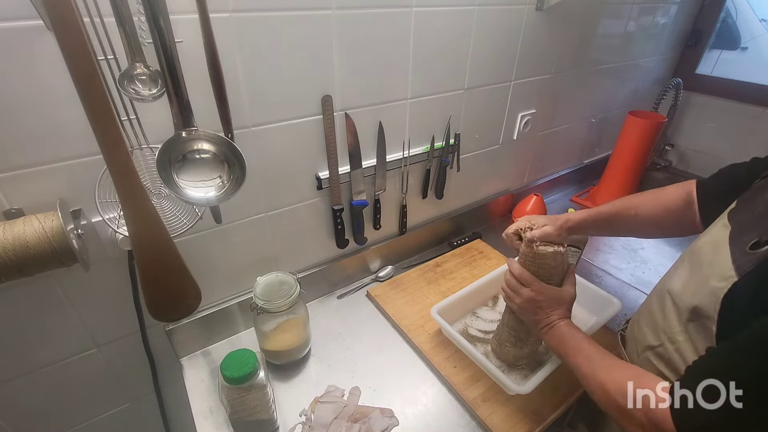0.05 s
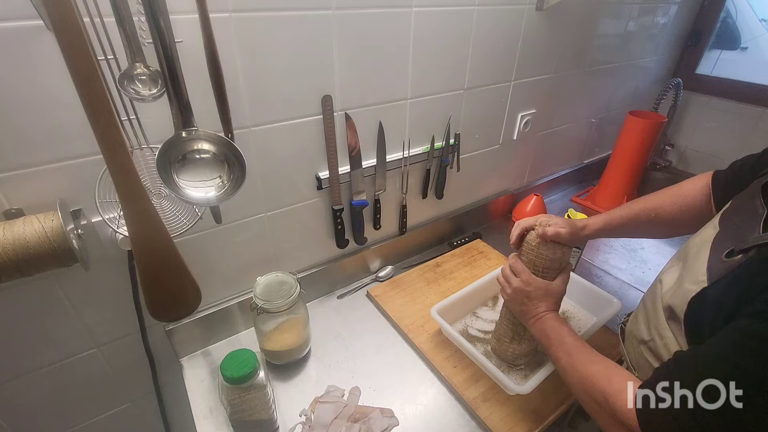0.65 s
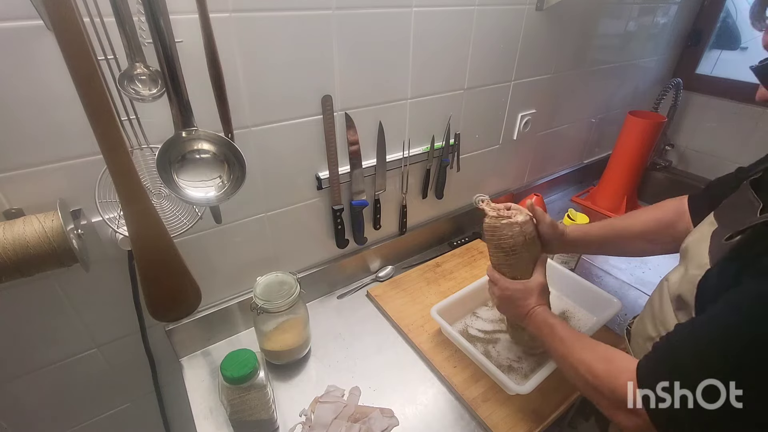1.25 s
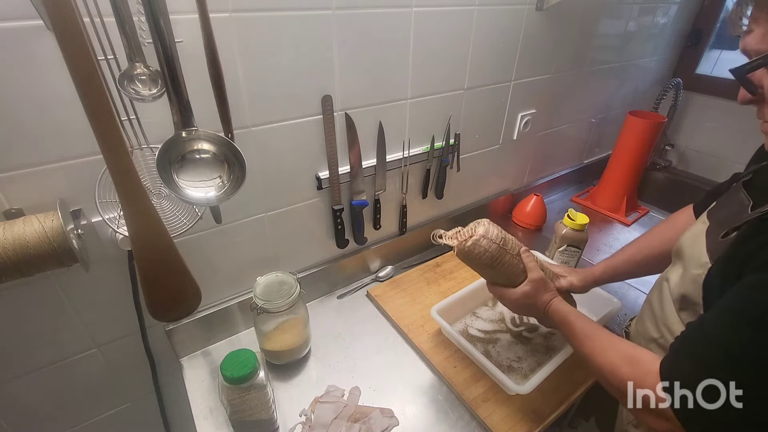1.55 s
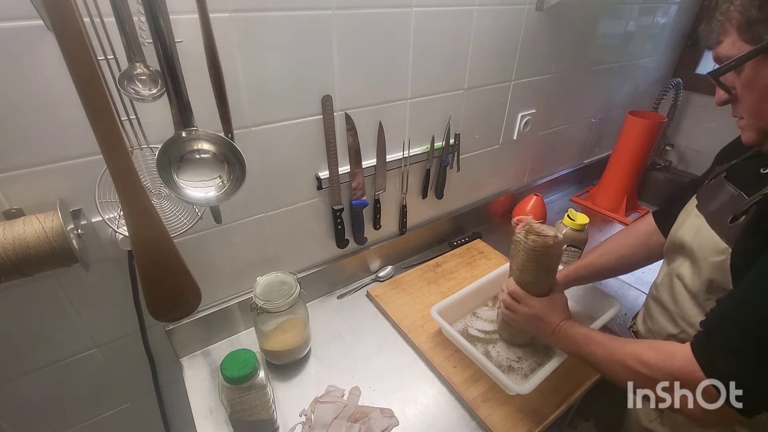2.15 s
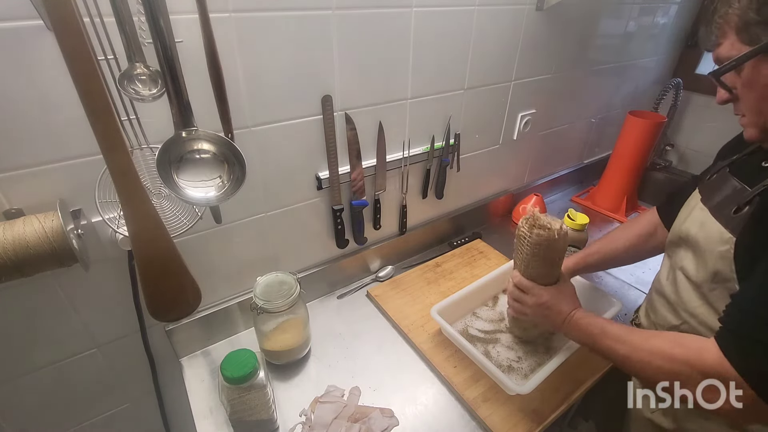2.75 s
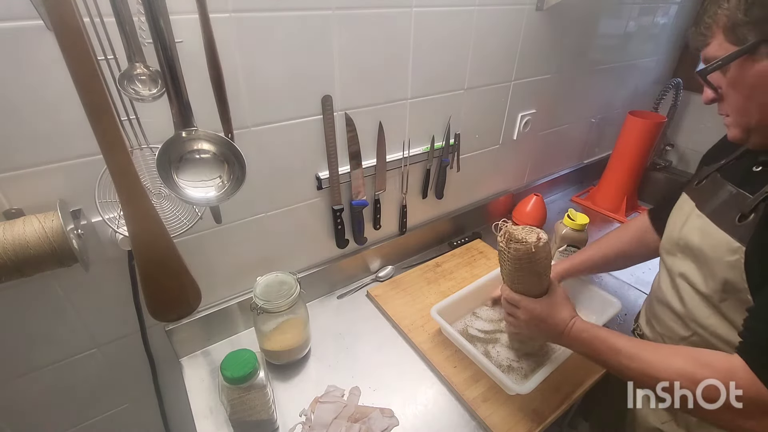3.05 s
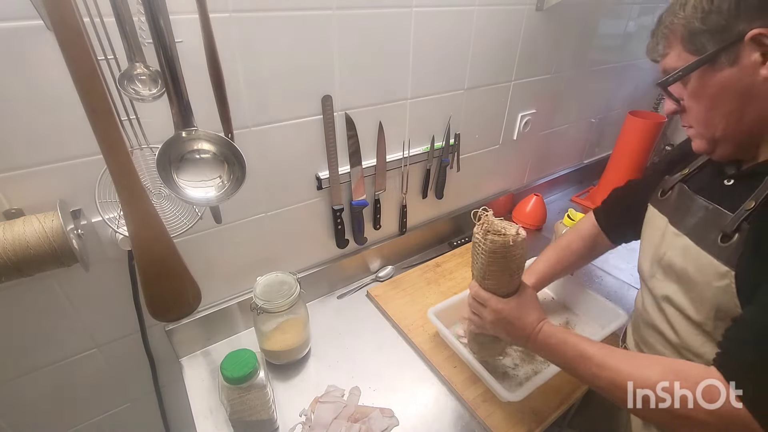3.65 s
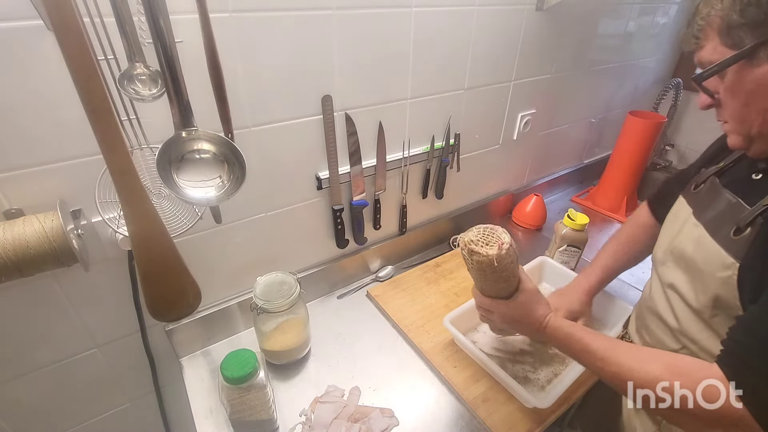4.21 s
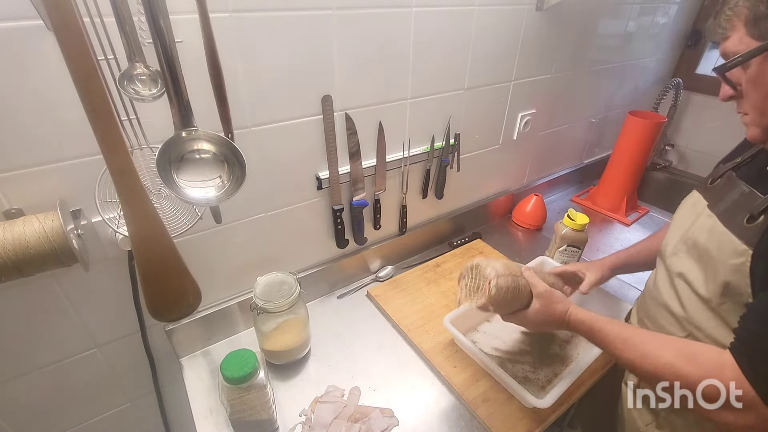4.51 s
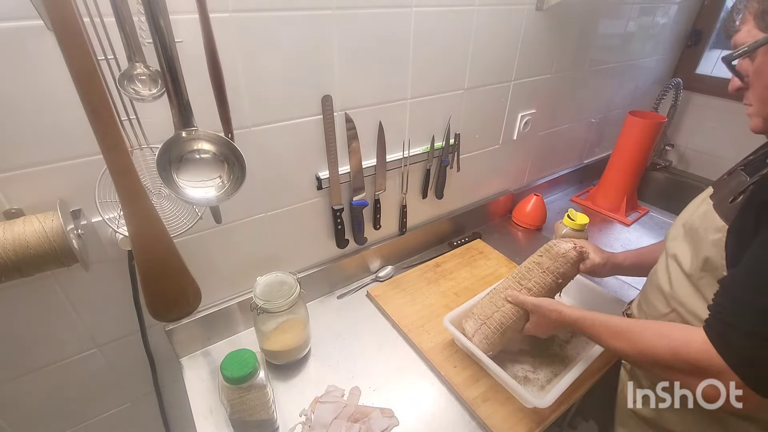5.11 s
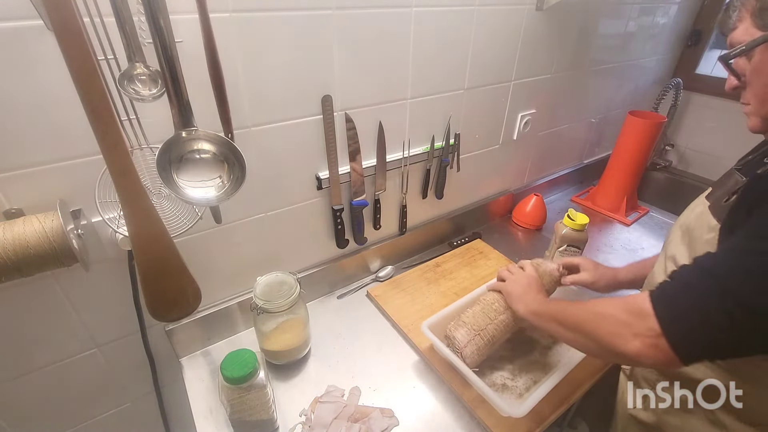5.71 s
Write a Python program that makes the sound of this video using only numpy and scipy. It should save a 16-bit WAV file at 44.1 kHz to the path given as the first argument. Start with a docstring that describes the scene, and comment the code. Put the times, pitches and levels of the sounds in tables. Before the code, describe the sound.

Hands rub netted meat in ground pepper with soft rustling, and a plastic tray knocks sharply on a wooden board.

```python
"""A plastic tray clacks on a wooden board as a netted joint of pork is stamped into ground pepper.
Each knock cracks the rim, rings the tray, slaps its floor flat and thuds the worktop.
Hands rub and twist the joint: the net rustles, scrapes and snaps, the dragged tray shudders,
and loose pepper hisses. A small tiled kitchen rings around the work, over a faint hush."""
import sys
import numpy as np
from scipy import signal
from scipy.fft import rfft, irfft, next_fast_len
from scipy.io import wavfile
from scipy.ndimage import uniform_filter1d

SR = 44100
rng = np.random.default_rng(int(sys.argv[2]) if len(sys.argv) > 2 else 0)


def digitize_waveform(pressure):
    """Quantize a signal to 16-bit integers and store it at the path in sys.argv[1].

    Rows of a 2-D input are taken as channels; values are limited to [-1, 1].
    """
    field = np.atleast_2d(pressure).T
    bounded = np.clip(field, -1, 1)
    quanta = np.round(bounded * 32767).astype(np.int16)
    wavfile.write(sys.argv[1], SR, quanta)


N = 263277
TIME_S = np.arange(N) / SR
RING_S = TIME_S[:SR * 3 // 5]
ROOM_T60_S, MIC_GAP_M = 0.41, 0.17
FULL_KNOCK_DB, FULL_PUSH_HZ = -18.5, 240  # clack level and thud cutoff at full force
ONSET_SAMPLES = 2200

# Meat stamped down. Each row: start in seconds, clack in dB, thud in dB, floor slap in dB.
KNOCKS = [(2.095, -19.5, -22.5, -6), (2.446, -24, -28.5, -19), (2.611, -46.5, -49.5, -38),
          (2.791, -20.5, -24.5, -21), (3.065, -38.5, -35.5, -27), (3.486, -44, -35, -30.5),
          (5.909, -32, -33.5, -9.5)]
# Hand or meat bumping the tray. Each row: start in seconds, thud in dB, thud cutoff in Hz.
BUMPS = [(0.054, -66.5, 91), (0.72, -66, 49.2), (0.83, -61.5, 49.5), (0.927, -64, 129), (1.118, -67, 70),
         (3.134, -36, 220), (3.561, -35.5, 393), (3.766, -32, 158), (4.07, -42.5, 93), (5.108, -29.5, 27.2),
         (5.899, -28.5, 54.9)]
def tray_clacks(slap_hz=790, slap_t60_s=0.013, bump_offset_db=-26):
    """Knocks clack the tray and slap its floor flat; bumps clack it faintly, more so when firm."""
    out = np.zeros((2, N))
    slap = np.sin(2 * np.pi * slap_hz * RING_S) * fade(slap_t60_s) * (1 - np.exp(-RING_S * slap_hz))
    for start_s, clack_db, _, slap_db in KNOCKS:
        add(out, start_s, clack(clack_db))
        add(out, start_s + seat_time_s(clack_db), amp(slap_db) * slap)
    for start_s, thud_db, cutoff_hz in BUMPS:
        firmness_db = 0.12 * 20 * np.log10(cutoff_hz / FULL_PUSH_HZ)
        add(out, start_s, clack(thud_db + bump_offset_db + firmness_db))
    return out


# Loaded tray. Each row: frequency in Hz, level in dB, nominal T60 in seconds.
TRAY_MODES = [(469, -9, .45), (543, -6, .3), (587, -8, .35), (642, 1, .3), (690, -8, .2), (792, -7, .28),
              (948, -8, .3), (1000, -10, .28), (1203, -10, .33), (1366, -11, .28), (2730, -18, .25)]
# Dense higher tray modes. Each row: frequency in Hz, density in dB.
CLATTER_SPECTRUM = [(150, -22.5), (400, -20.5), (520, -6.5), (720, -9.5), (1050, -11), (1600, -14),
                    (2200, -17), (2900, -20.5), (5000, -26.5), (7800, -30), (8900, -38.5), (15000, -38)]
# Hard rim striking. Each row: frequency in Hz, density in dB.
RIM_SPECTRUM = [(300, -23.5), (1000, 3), (2000, -1.5), (3000, 7), (5000, 0), (7700, -10), (9000, -21.5),
                (15000, -40)]
def clack(db, full_contact_hz=5300, full_crack_db=-20.5):
    """The rim cracks down first; the tray rings as its floor settles. Harder is brighter."""
    force = amp(db - FULL_KNOCK_DB)
    seating = 1 - np.exp(-np.pi * RING_S / seat_time_s(db))
    modes = unit(ring(TRAY_MODES, t60_scale=0.96), ONSET_SAMPLES)
    decay = fade(ROOM_T60_S) + amp(3) * fade(t60_s=0.0089)
    clatter = unit(colour(diffuse(len(RING_S)) * decay, CLATTER_SPECTRUM), ONSET_SAMPLES)
    tray = soften(seating * (modes + clatter), full_contact_hz * force ** 0.43)
    crack = burst(RIM_SPECTRUM, t60_s=0.028, echo_db=-12)
    return amp(db) * unit(tray, ONSET_SAMPLES) + amp(full_crack_db) * force ** 4 * crack


def seat_time_s(db, full_seat_s=0.022):
    """A harder knock flexes the tray floor further, so it lies flat later."""
    return full_seat_s * amp(db - FULL_KNOCK_DB) ** 2.665


def worktop_thuds():
    """In a knock the weight lands while the tray floor settles; in a bump the hand damps the ring."""
    out = np.zeros((2, N))
    for start_s, clack_db, thud_db, _ in KNOCKS:
        force = amp(clack_db - FULL_KNOCK_DB)
        landing_s = start_s + seat_time_s(clack_db) / 2
        add(out, landing_s, amp(thud_db) * thud(FULL_PUSH_HZ * force ** 0.17, t60_scale=1))
    for start_s, thud_db, cutoff_hz in BUMPS:
        add(out, start_s, amp(thud_db) * thud(cutoff_hz, t60_scale=0.91))
    return out


# Board and worktop. Each row: frequency in Hz, level in dB, nominal T60 in seconds.
WORKTOP_MODES = [(55.33, -1, 0.4), (73.2, 0.5, 0.14), (116.3, -5.5, 0.44), (150, 4.5, 0.13),
                 (175.5, -10, 0.86), (203.1, -2.5, 0.44), (248.7, -18, 0.82), (302, -8.5, 0.12),
                 (370.6, -3, 0.41)]
def thud(cutoff_hz, t60_scale, rise_s=0.0014, boom_db=-4):
    """The soft weight drives the worktop's low modes; the room booms along."""
    modes = unit(ring(WORKTOP_MODES, t60_scale), ONSET_SAMPLES)
    boom_hz_db = [(40, -25), (70, 4.5), (150, -6), (330, 1.5), (900, -25.5)]
    boom = colour(diffuse(len(RING_S)) * fade(ROOM_T60_S * t60_scale), boom_hz_db)
    push = (modes + amp(boom_db) * unit(boom, ONSET_SAMPLES)) * (1 - np.exp(-RING_S / rise_s))
    return unit(soften(push, cutoff_hz), ONSET_SAMPLES)


# Hand movements. Each row: start in seconds, end in seconds, base level in dB.
NET_STROKES = [(0.0, 0.09, -69), (0.316, 0.435, -63), (0.53, 0.615, -63.5), (0.7, 1.1, -58),
               (1.134, 1.193, -54), (1.162, 1.35, -63), (1.28, 1.598, -52.5), (1.617, 2.127, -74),
               (4.7, 5.1, -64), (5.093, 5.152, -52.5), (5.207, 5.413, -65), (5.468, 5.746, -58),
               (5.71, 5.875, -42.5)]
PEPPER_SCOOPS = [(3.125, 3.328, -41.5), (3.576, 3.673, -44), (3.747, 3.891, -37.5), (3.82, 3.97, -41.5),
                 (4.076, 4.208, -41)]
TRAY_DRAGS = [(3.02, 3.44, -41.5), (3.37, 3.67, -41.5), (3.68, 4.03, -43.5), (5.2, 5.3, -51.5),
              (5.24, 5.5, -59), (5.55, 5.8, -50), (5.75, 5.99, -42)]
JOINT_TWISTS = [(0.46, 0.89, -58.5), (1.08, 1.73, -60), (4.2, 4.66, -66)]
# Sliding net, rubbed tray floor, dragged tray. Each row: frequency in Hz, density in dB.
NET_SPECTRUM = [(300, -28), (900, -20.5), (1250, -3.5), (1550, 0), (2100, -2.5), (2450, -2.5), (3300, -2.5),
                (5000, -5), (6800, -9), (7800, -5), (8700, -17), (15000, -42)]
FLOOR_SPECTRUM = [(120, -8.5), (230, -9), (330, -1), (450, -3), (600, -6.5), (690, 3), (790, -0.5),
                  (1000, -1.5), (1250, 1.5), (2000, -25.5)]
SHUDDER_SPECTRUM = [(40, -16.5), (65, 9), (95, -5.5), (140, 7), (200, 5), (280, -3), (400, -3),
                    (700, -31.5)]
# Tray wall and net scrape resonances. Each row: frequency in Hz, nominal width in Hz, gain in dB.
WALL_MODES = [(595.5, 22, 9.5), (780, 20, 0.5), (1300, 100, -24), (1813, 120, -1.5), (2072, 46, -4),
              (3000, 130, -4), (3550, 210, -17.5), (4970, 230, -21.5)]
SCRAPE_MODES = [(1215, 70, 11), (2100, 45, 6), (2980, 90, 4), (3460, 50, 6), (4110, 60, 0), (4510, 90, 0)]
def rubbing():
    """The net rustles and scrapes, the rubbed floor rings the walls, the tray catches and slips."""
    slides = NET_STROKES + PEPPER_SCOOPS + offset_db(TRAY_DRAGS, -9)
    presses = (offset_db(NET_STROKES, -11) + offset_db(PEPPER_SCOOPS, -2)
               + offset_db(TRAY_DRAGS, -4.5) + offset_db(JOINT_TWISTS, -5))
    shoves = TRAY_DRAGS + offset_db(JOINT_TWISTS, -15)
    rustle = friction(slides, NET_SPECTRUM, slips_per_s=6700, tail_db=-0.5)
    scrape = friction(offset_db(JOINT_TWISTS, -4.5), NET_SPECTRUM, slips_per_s=700, tail_db=4.5)
    rub = friction(presses, FLOOR_SPECTRUM, slips_per_s=800, tail_db=-0.5)
    shudder = friction(shoves, SHUDDER_SPECTRUM, slips_per_s=170, tail_db=4)
    return resonate(rustle + rub, WALL_MODES) + resonate(scrape, SCRAPE_MODES) + shudder


# Fine pepper grit. Each row: frequency in Hz, density in dB.
GRIT_SPECTRUM = [(3000, -42), (7500, -2.5), (9000, 3.5), (11000, 2), (13500, 3.5), (16000, 4)]
def pepper(light_touch_db=-59.5, throw_s=0.036, throw_db=-26.5, settle_t60_s=0.55):
    """Grains hiss when brushed, scooped or shaken; knocks throw them up and they trickle back."""
    # Below light_touch_db a stroke hisses more than it rustles.
    brushed = [(start_s, end_s, light_touch_db + 0.65 * (db - light_touch_db))
               for start_s, end_s, db in NET_STROKES]
    swept = brushed + offset_db(PEPPER_SCOOPS, -2.5) + offset_db(TRAY_DRAGS, -20)
    thrown = [(start_s, start_s + throw_s, db + throw_db) for start_s, db, *_ in KNOCKS]
    hiss = friction(swept, GRIT_SPECTRUM, slips_per_s=5000, tail_db=0.5, tail_t60_s=0.19)
    trickle = friction(thrown, GRIT_SPECTRUM, slips_per_s=2800, tail_db=0.5, tail_t60_s=settle_t60_s)
    return hiss + trickle


# Net strands snapping. Each row: start in seconds, level in dB.
STRAND_SNAPS = [(0.925, -46), (1.155, -55), (3.765, -54)]
def net_snaps():
    """A taut strand slips off a finger with a dry crack."""
    out = np.zeros((2, N))
    snap_hz_db = [(200, 0), (600, 4.5), (2000, 8.5), (4500, 5.5), (8000, -8), (15000, -18)]
    for start_s, db in STRAND_SNAPS:
        add(out, start_s, amp(db) * burst(snap_hz_db, t60_s=0.05, echo_db=-7))
    return out


# Quiet kitchen. Each row: frequency in Hz, density in dB.
HUSH_SPECTRUM = [(20, -11), (55, -2), (110, -8.5), (250, -20.5), (600, -19), (1200, -16), (3000, -18),
                 (7800, -18), (9000, -24), (16000, -25.5)]
def kitchen_hush(level_db=-67.5):
    """Faint steady noise from all sides."""
    return amp(level_db) * unit(colour(diffuse(N), HUSH_SPECTRUM))


def friction(strokes, spectrum, slips_per_s, tail_db, tail_t60_s=ROOM_T60_S):
    """Strokes made of many tiny slips, whose energy lingers in a decaying tail."""
    power = np.zeros(N)
    for start_s, end_s, db in strokes:
        moving = np.flatnonzero((TIME_S > start_s) & (TIME_S < end_s))
        power[moving] += amp(db) ** 2 * np.hanning(len(moving)) ** 0.7  # speeds up, slows down
    impulses = (rng.random(N) < slips_per_s / SR) * rng.exponential(size=N)
    slips = uniform_filter1d(impulses, size=16).clip(0)
    pole = np.exp(-2 * np.log(1000) / (tail_t60_s * SR))
    tail = amp(tail_db) ** 2 * signal.lfilter([1 - pole], [1, -pole], power)
    envelope = np.sqrt((power * slips / slips.mean() + tail) / (1 + amp(tail_db) ** 2))
    filter_gain = np.linalg.norm(colour(signal.unit_impulse(len(RING_S)), spectrum))
    return colour(diffuse(N) * envelope, spectrum) / filter_gain


def burst(spectrum, t60_s, echo_db):
    """A noise crack and its echo off the tiles, rms 1 at the start."""
    decay = fade(t60_s) + amp(echo_db) * fade(ROOM_T60_S)
    return unit(colour(diffuse(len(RING_S)) * decay, spectrum), samples=220)


def ring(modes, t60_scale):
    """Decaying modes, detuned slightly at each blow by the shifting load."""
    draws = rng.standard_normal((len(modes), 2))
    detunes = 1 + 0.005 * draws[:, 0]
    signs = np.sign(draws[:, 1])
    return sum(sign * amp(db) * np.sin(2 * np.pi * hz * detune * RING_S) * fade(t60_s * t60_scale)
               for (hz, db, t60_s), detune, sign in zip(modes, detunes, signs))


def resonate(x, modes):
    """Add resonances at least 40 Hz wide."""
    return x + sum(amp(db) * signal.lfilter(*signal.iirpeak(hz, hz / max(width_hz, 40), fs=SR), x)
                   for hz, width_hz, db in modes)


def diffuse(samples):
    """Noise from all sides: alike in both channels in the bass, unrelated in the treble."""
    coherence = np.sinc(2 * np.fft.rfftfreq(samples, 1 / SR) * MIC_GAP_M / 343)
    white = rfft(rng.standard_normal((2, samples)))
    mid, side = irfft(white * np.sqrt([1 + coherence, 1 - coherence]), samples)
    return unit(np.array([mid + side, mid - side]))


def colour(x, spectrum):
    """Minimum-phase filter through (Hz, dB) points."""
    size = next_fast_len(2 * x.shape[-1], real=True) // 2 * 2
    hz, db = np.transpose(spectrum)
    grid_hz = np.maximum(np.fft.rfftfreq(size, 1 / SR), 1)
    gain = amp(np.interp(np.log(grid_hz), np.log(hz), db))
    cepstrum = irfft(np.log(gain))
    cepstrum[1:size // 2] *= 2
    cepstrum[size // 2 + 1:] = 0
    return irfft(rfft(x, size) * np.exp(rfft(cepstrum)))[..., :x.shape[-1]]


def soften(x, cutoff_hz):
    """Low-pass: a soft contact excites little treble."""
    return signal.sosfilt(signal.butter(2, min(cutoff_hz, SR / 3), fs=SR, output="sos"), x)


def fade(t60_s):
    """Exponential decay, 60 dB in t60_s."""
    return np.exp(-np.log(1000) * RING_S / t60_s)


def amp(db):
    """Decibels to gain."""
    return 10 ** (np.asarray(db) / 20)


def unit(x, samples=None):
    """Scale to rms 1 over the first samples, or over all."""
    return x / np.sqrt(np.mean(x[..., :samples] ** 2))


def offset_db(strokes, db):
    """The same strokes, shifted in level."""
    return [(start_s, end_s, level_db + db) for start_s, end_s, level_db in strokes]


def add(out, start_s, x):
    """Mix x in at start_s."""
    start = int(start_s * SR)
    out[:, start:start + x.shape[-1]] += x[..., :N - start]


# The left channel is louder, most at a microphone resonance near 8 kHz, and nearly level above it.
# Each row: frequency in Hz, left minus right in dB.
LEFT_BIAS = [(60, 2), (200, 1.5), (400, 1), (750, 1.2), (1300, 2.5), (2400, 4.5), (4400, 5), (7900, 10),
             (8800, 0.5)]
def scene():
    """The handling over the kitchen's hush, louder in the left channel."""
    mix = tray_clacks() + worktop_thuds() + rubbing() + pepper() + net_snaps() + kitchen_hush()
    return np.array([colour(channel, [(hz, side * db / 2) for hz, db in LEFT_BIAS])
                     for channel, side in zip(mix, (1, -1))])


def record(dry):
    """Cut the deepest rumble and the top of the treble."""
    low_hz, top_hz = 42, 15850
    dry = signal.sosfilt(signal.butter(6, low_hz, "high", fs=SR, output="sos"), dry)
    return signal.sosfilt(signal.ellip(10, 0.2, 90, top_hz, fs=SR, output="sos"), dry)


dry = scene()
out = record(dry)
digitize_waveform(out)
```